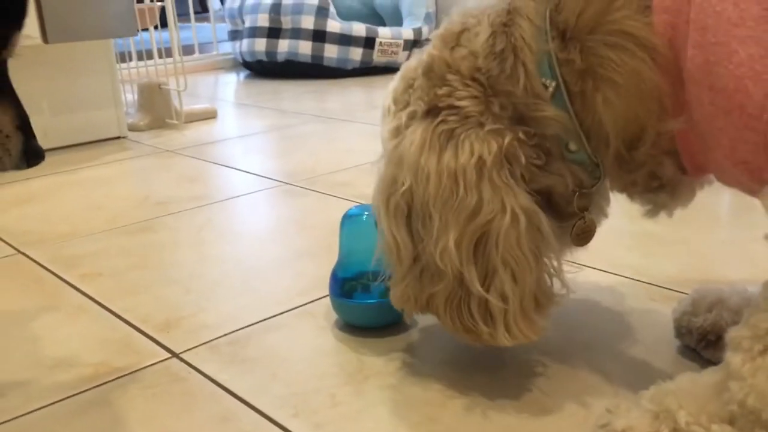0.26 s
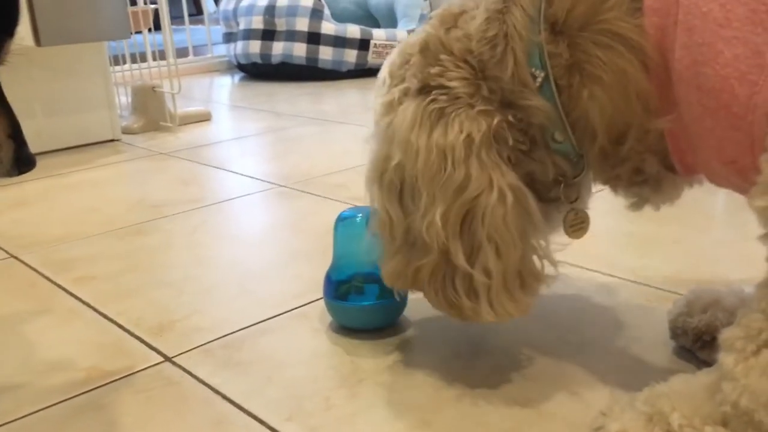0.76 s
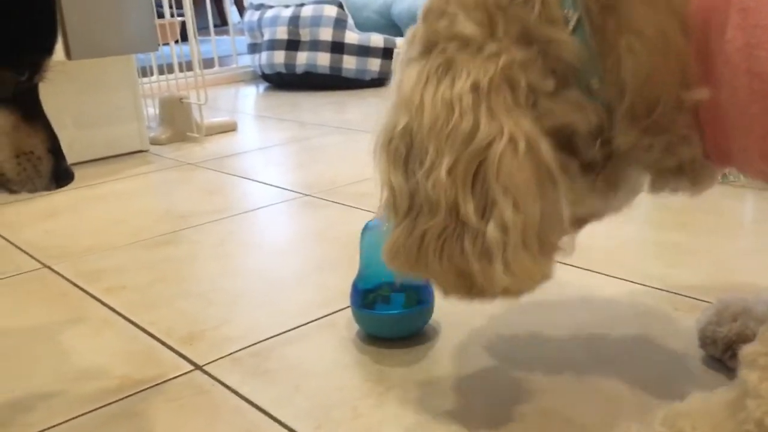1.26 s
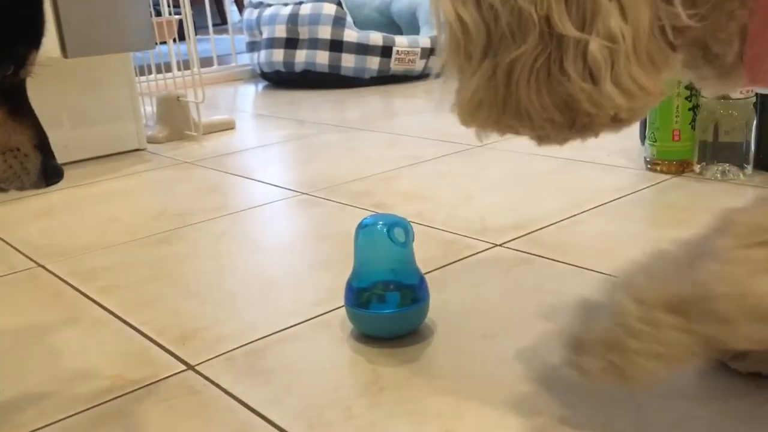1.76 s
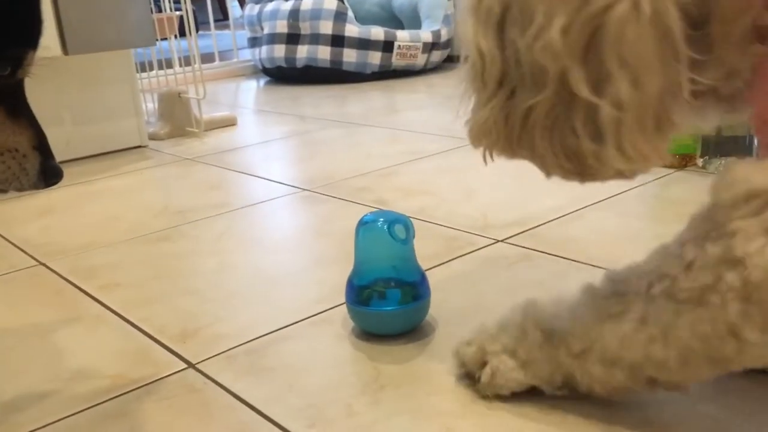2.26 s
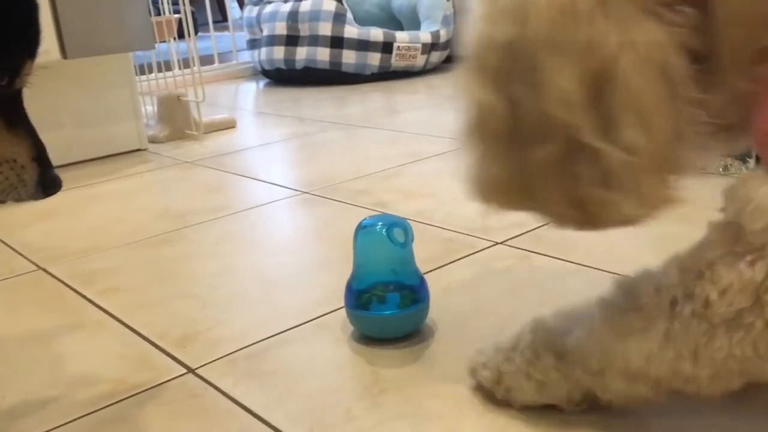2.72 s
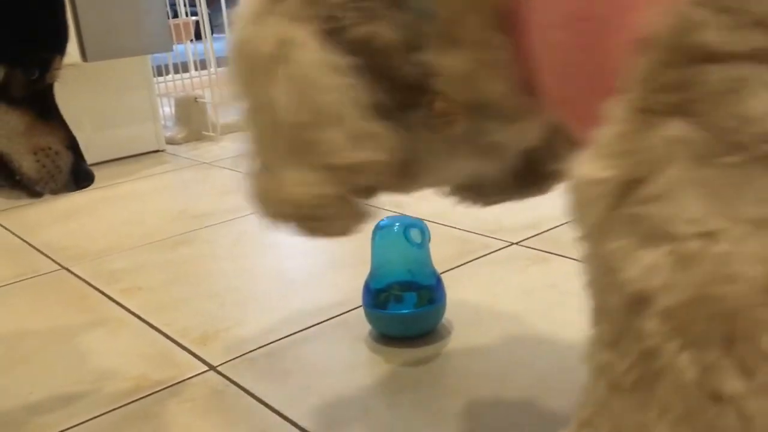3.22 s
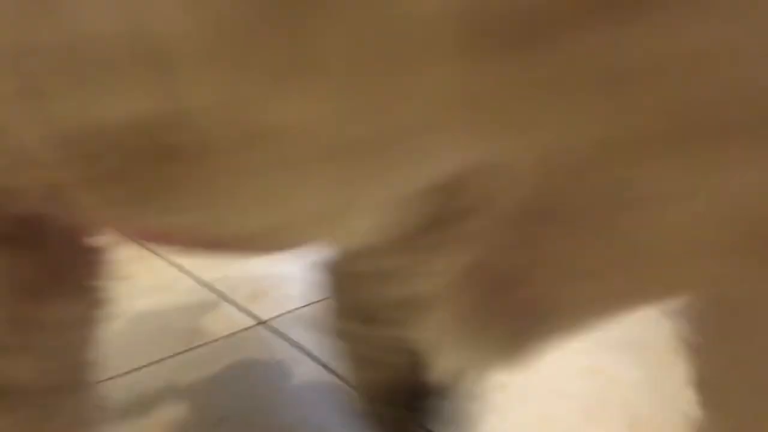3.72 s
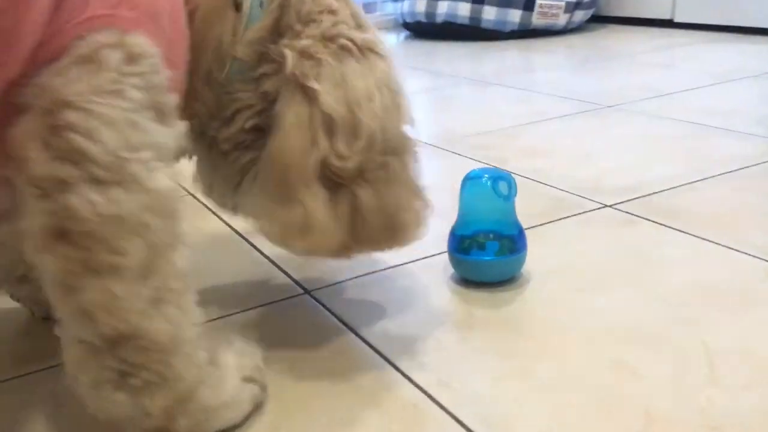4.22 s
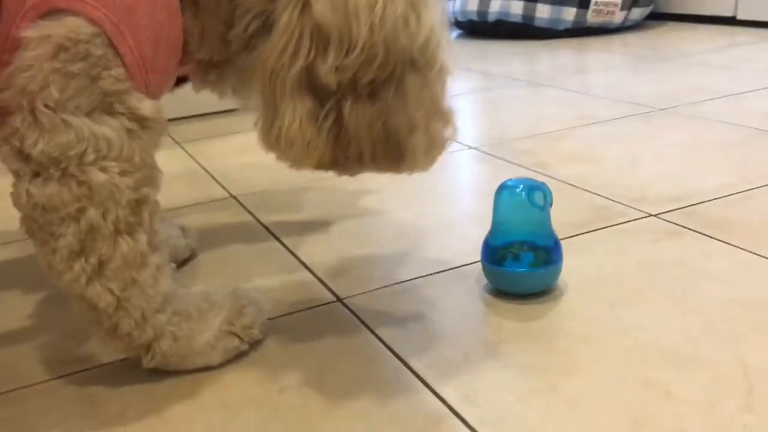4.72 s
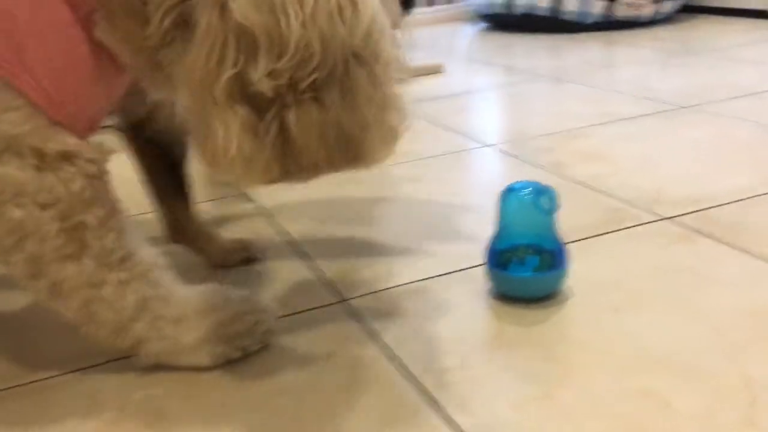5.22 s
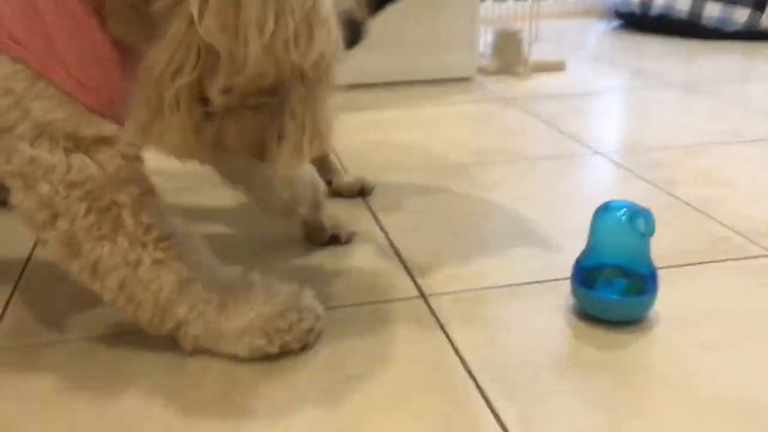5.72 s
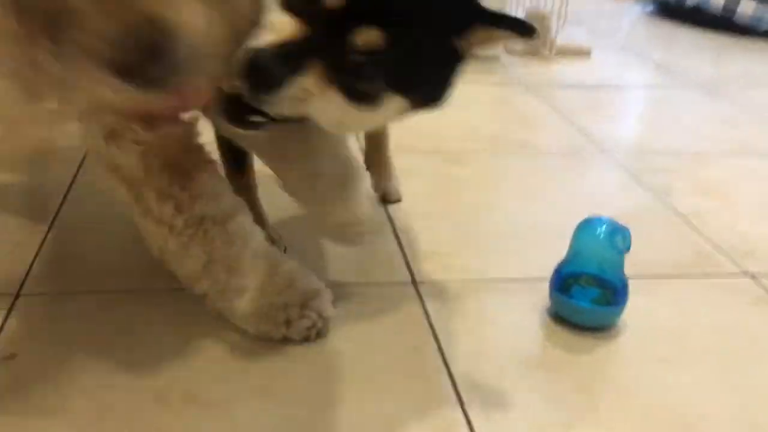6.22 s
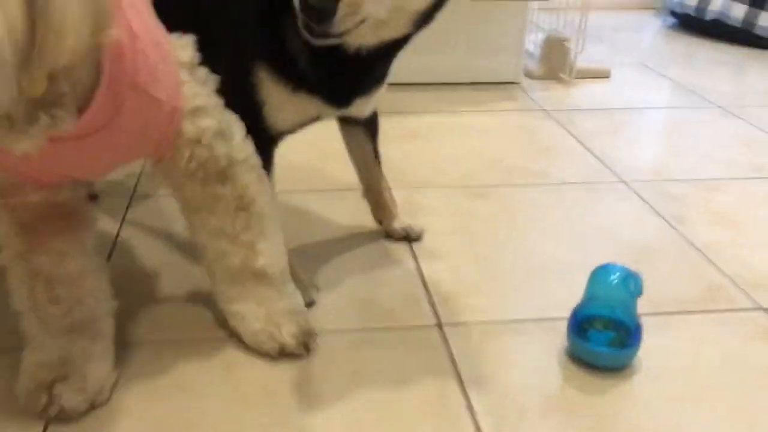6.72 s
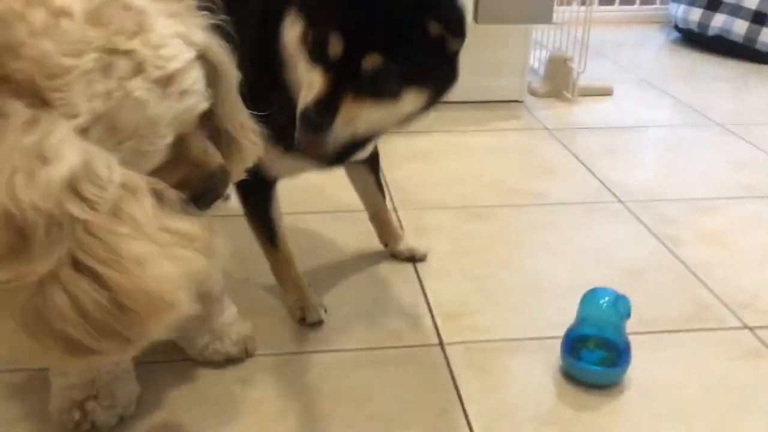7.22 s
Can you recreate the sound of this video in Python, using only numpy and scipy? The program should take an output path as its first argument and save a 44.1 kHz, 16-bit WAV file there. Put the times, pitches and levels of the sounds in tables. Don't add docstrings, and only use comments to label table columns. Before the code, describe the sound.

Dog claws click in quick clusters on hard tile around a hollow plastic toy, with fur scuffs, soft pad thuds and phone handling bumps.

```python
import sys
import numpy as np
from scipy import signal
from scipy.fft import rfft, irfft
from scipy.io import wavfile
from scipy.ndimage import uniform_filter1d

SR = 44100
rng = np.random.default_rng(int(sys.argv[2]) if len(sys.argv) > 2 else 0)


def inscribe(sig):
    pcm = np.round(np.clip(np.atleast_2d(sig).T, -1, 1) * 32767)
    wavfile.write(sys.argv[1], SR, pcm.astype(np.int16))


def decibels_to_gain(level_db):
    exponent = np.asarray(level_db, float) / 20
    return 10 ** exponent


N = 329532


def unit(x):
    return x / np.sqrt(np.mean(x ** 2))


def curve(table):
    rows = np.array(table)
    return np.interp(np.arange(N) / SR, rows[:, 0], rows[:, 1])


def response(points, size=N):
    hz, db = np.transpose(points)
    bins_hz = np.fft.rfftfreq(size, 1 / SR) + 1
    return decibels_to_gain(np.interp(np.log(bins_hz), np.log(hz), db))


def coloured(points):
    return unit(irfft(rfft(rng.standard_normal(N)) * response(points), N))


def band(x, hz, width_hz):
    return signal.lfilter(*signal.iirpeak(hz, hz / width_hz, SR), x)


def walk(rate_hz):
    hold = int(SR / rate_hz)
    steps = np.repeat(rng.standard_normal(N // hold + 1), hold)
    return unit(uniform_filter1d(uniform_filter1d(steps, hold), hold)[:N])


def add(out, s, sound):
    i = min(max(int(s * SR), 0), len(out))
    out[i:i + len(sound)] += sound[:len(out) - i]


# pitch_hz, level_db (per Hz)
AIR_COLOUR = [(60, -36), (120, -10.5), (160, 4), (210, -7.5), (320, -10.5), (500, -19), (1000, -20.5),
              (2000, -29.5), (4000, -28), (8000, -30), (16000, -24)]


def room_hiss(level_db=-60):
    return decibels_to_gain(level_db) * coloured(AIR_COLOUR)


def port_hiss(hz=4590, width_hz=130, level_db=-80.5):
    noise = rng.standard_normal(N)
    return decibels_to_gain(level_db) * unit(band(band(noise, hz, width_hz), hz, width_hz))


# start_s, end_s, pitch_hz, level_db
LENS_WHINES = [
    (2.04, 2.28, 12780, -76),
    (7.14, 7.38, 12800, -78),
]


def whine(fade_s=0.01):
    t = np.arange(N) / SR
    out = np.zeros(N)
    for start, end, hz, db in LENS_WHINES:
        fade = np.clip(np.minimum(t - start, end - t) / fade_s, 0, 1)
        out += decibels_to_gain(db) * fade * np.sin(2 * np.pi * hz * t)
    return out


FOCUS_BEATS = [2, 8, 11, 14, 20, 26, 32, 38, 44, 50, 104, 110, 116, 122, 128, 139, 146]
# peak_db, ring_hz, brightness_db
FOCUS_CLICKS = [
    (-45.5, 5200, -1.5),
    (-50.5, 4900, 5.5),
]
FOCUS_START_S, FOCUS_BEAT_S, FOCUS_GAP_S = 0.049, 0.05, 0.0048
STEADY_BEATS = [0, 3, 9, 12, 15, 18, 21, 40, 41, 47, 50, 51, 54, 57, 58, 62, 68, 70]
# peak_db, ring_hz, brightness_db
STEADY_CLICK = (-44.5, 5100, -3)
STEADY_START_S, STEADY_BEAT_S = 0.0058, 0.1024


def motors(ring_s=0.0002, crack_s=0.00019, crack_hz=8500, scatter_db=-1.5):
    clicks = [(FOCUS_START_S + beat * FOCUS_BEAT_S + k * FOCUS_GAP_S, *click)
              for beat in FOCUS_BEATS for k, click in enumerate(FOCUS_CLICKS)]
    clicks += [(STEADY_START_S + beat * STEADY_BEAT_S, *STEADY_CLICK) for beat in STEADY_BEATS]
    out, t = np.zeros(N), np.arange(-40, 40) / SR
    for (s, db, hz, bright_db), c in zip(clicks, rng.standard_normal(len(clicks))):
        ring = np.sin(2 * np.pi * hz * t) * np.exp(-(t / ring_s) ** 2)
        crack = decibels_to_gain(bright_db) * np.cos(2 * np.pi * crack_hz * t) * np.exp(-(t / crack_s) ** 2)
        add(out, s + t[0], decibels_to_gain(db + scatter_db * c) * (ring + crack))
    return out


# time_s, level_db
GRIP_LEVEL = [(0.0, -50), (0.25, -50.5), (0.77, -50.5), (1.04, -57), (1.27, -49.5), (1.77, -57),
              (2.18, -54.5), (2.7, -58), (3.64, -56.5), (3.99, -51), (5.22, -56), (5.43, -48), (5.82, -54),
              (6.12, -50.5), (6.24, -49), (6.62, -50), (6.99, -49.5), (7.47, -48.5)]
# pitch_hz, level_db (per Hz)
GRIP_COLOUR = [(12, -48), (25, -7), (42, 5.5), (65, 2.5), (110, -9.5), (200, -19), (400, -41.5),
               (900, -52.5)]


def grip():
    lumps_db = 2.5 * walk(33) + 0.6 * walk(6)
    return decibels_to_gain(curve(GRIP_LEVEL) + 3.0 + lumps_db) * coloured(GRIP_COLOUR)


# centre_s, peak_db, pitch_hz, direction (1 or -1)
WRIST_SWAYS = [(.034, -39.5, 49, 1), (.07, -43, 50, 1), (6.815, -37, 90, 1), (3.23, -42, 100, -1),
               (1.165, -44, 121, 1), (.174, -37.5, 80, -1), (.368, -35.5, 58, 1), (.457, -37.5, 67, -1),
               (.66, -41, 49, 1), (.7985, -31.5, 71.5, -1), (1.34, -39, 72, -1), (3.988, -42, 64, -1),
               (4.0997, -38, 71.5, -1), (5.116, -35, 62, -1), (5.528, -36, 48, -1), (5.612, -38, 58, 1),
               (6.142, -38, 93, 1), (6.241, -32, 51.7, -1), (6.3445, -37, 51, 1), (6.445, -41, 62, 1),
               (6.5516, -37.5, 58, 1), (6.595, -38.5, 50, 1), (6.7156, -37.5, 62, -1), (6.976, -35, 57, 1),
               (7.103, -37, 47.7, 1), (7.195, -38, 45, -1), (7.305, -38, 45, 1)]


def sways(cycles=0.86):
    out, t = np.zeros(N), np.arange(-3000, 3000) / SR
    for s, db, hz, direction in WRIST_SWAYS:
        swing = np.exp(-(t * hz / cycles) ** 2) * np.cos(2 * np.pi * hz * t)
        add(out, s + t[0], np.sign(direction) * decibels_to_gain(db) * swing)
    return out


# largest_swing_s, peak_db, pitch_hz
FINGER_PRESSES = [(0.162, -38.5, 76), (0.447, -37.5, 128), (0.7098, -31.5, 98), (1.0622, -24, 111),
                  (1.451, -31.5, 119), (1.507, -37, 227), (1.7323, -37, 80), (1.826, -33, 218),
                  (2.291, -24, 107), (4.1076, -32, 69), (4.1829, -29, 143), (4.2648, -32, 146),
                  (4.6565, -28.5, 110), (4.897, -24.5, 109), (4.9735, -25.5, 127), (5.1266, -31.5, 65.6),
                  (5.3767, -35, 98), (5.507, -37.5, 205), (6.0714, -39.5, 190), (6.7995, -30.5, 187),
                  (7.3632, -17, 83), (7.3924, -25.5, 158)]
# largest_swing_s, peak_db, pitch_hz
FINGER_RELEASES = [(1.7375, -36, 61), (0.7474, -40, 145), (0.7805, -34, 90), (1.222, -42.5, 170),
                   (1.2449, -39, 137), (3.8397, -36, 91), (4.734, -35, 100), (4.7555, -33, 68.6),
                   (4.75, -33.5, 124), (5.111, -34, 85), (4.9812, -26.5, 86.6), (5.2513, -30.5, 66),
                   (5.742, -31, 101), (5.8339, -42.5, 188), (6.0835, -35.5, 163), (6.0957, -33.5, 104),
                   (6.625, -30.5, 74), (7.0383, -29.5, 72.5), (7.0531, -36, 73.5)]
ROLL_LEAD_S, ROLL_DB = 0.0153, -26


def thumps(glide_s=0.0038, low_share=0.36, rise_s=0.0026, fade_s=0.015, slap_s=0.0016, slap_db=-12,
           abrupt=1.26, shorter=0.67):
    rolls = [(s - ROLL_LEAD_S, db + ROLL_DB, hz) for s, db, hz in FINGER_PRESSES]
    jolts = [(*row, 1) for row in FINGER_PRESSES]
    jolts += [(*row, -1) for row in list(FINGER_RELEASES) + rolls]
    out, t = np.zeros(N), np.arange(-441, 4000) / SR
    for s, db, hz, direction in jolts:
        glide = glide_s * (1 - np.exp(-t / glide_s))
        turns = 1.345 * hz * (low_share * t + (1 - low_share) * glide)
        rise = np.exp(-(t / rise_s) ** 2)
        fade = np.exp(-np.abs(t / fade_s * (hz / 130) ** shorter) ** abrupt)
        swings = np.where(t < 0, rise, fade) * np.cos(2 * np.pi * turns)
        lead = t + 0.435 / hz
        slap = -decibels_to_gain(slap_db) * np.exp(-(lead / slap_s) ** 2) * np.cos(2 * np.pi * 2.0 * hz * lead)
        add(out, s + t[0], np.sign(direction) * decibels_to_gain(db) * (swings + slap))
    return out


# centre_s, peak_db, pitch_hz
HOLLOW_KNOCKS = [(.680, -45, 1000), (.697, -52, 800), (4.295, -46.5, 800), (4.8914, -42, 240),
                 (7.3591, -31, 168), (7.241, -48, 1500), (7.462, -43.5, 1200), (1.343, -44.5, 720),
                 (1.358, -50, 700), (1.47, -48, 294), (1.474, -56, 650), (1.727, -45.5, 400),
                 (1.811, -39.5, 200), (1.775, -44, 150), (3.906, -42.5, 600), (3.909, -34, 1300),
                 (4.539, -43, 1010), (4.719, -52, 1500), (4.749, -48, 650), (4.969, -43, 590),
                 (4.981, -42.5, 700), (5.029, -49, 603), (5.125, -50, 650), (7.391, -46, 900)]


def knocks(cycles=0.74):
    out, t = np.zeros(N), np.arange(-200, 200) / SR
    for s, db, hz in HOLLOW_KNOCKS:
        add(out, s + t[0], decibels_to_gain(db) * np.exp(-(t * hz / cycles) ** 2) * np.cos(2 * np.pi * hz * t))
    return out


# start_s, level_db, floor_ring_hz
PAD_THUDS = [(2.001, -68, 292), (2.706, -45.5, 296), (3.2, -51.5, 282), (3.401, -42.5, 194),
             (3.717, -52, 297), (3.905, -42, 129), (4.379, -42.5, 142), (4.526, -47.5, 280),
             (5.211, -44, 240), (4.86, -50, 273), (5.601, -52, 235), (6.043, -43.5, 194),
             (6.647, -42.5, 298), (6.645, -46, 504), (7.238, -57.5, 480), (6.36, -55, 350)]


def pads(rise_s=0.0012, fade_s=0.025, width=0.56):
    out, t = np.zeros(N), np.arange(6000) / SR
    swell = (1 - np.exp(-(t / rise_s) ** 2)) * np.exp(-t / fade_s)
    for (s, db, hz), c in zip(PAD_THUDS, rng.standard_normal((len(PAD_THUDS), len(t)))):
        floor = unit(band(band(c, hz, width * hz), hz, width * hz))
        add(out, s, decibels_to_gain(db) * swell * floor)
    return out


# start_s, end_s, level_db, rasp_hz
NAIL_DRAGS = [(.44, 0.515, -67.5, 3300), (1.108, 1.356, -64.5, 3780), (1.55, 1.617, -66, 3720),
              (2.053, 2.153, -69, 3580), (2.159, 2.185, -57, 3140), (2.528, 2.573, -64.5, 4000),
              (2.815, 2.864, -51.5, 3340), (3.07, 3.213, -53, 3380), (3.259, 3.272, -49, 2860),
              (3.282, 3.349, -59.5, 2720), (3.46, 3.469, -37.5, 4000), (3.556, 3.573, -45, 4270),
              (3.566, 3.578, -42, 3600), (4.332, 4.4, -54.5, 3180), (4.339, 4.363, -46.5, 3950),
              (4.366, 4.379, -53, 3540), (7.0, 7.15, -64.5, 3580), (4.425, 4.46, -49, 7000),
              (4.433, 4.461, -46, 4400), (3.558, 3.573, -55, 7200), (4.387, 4.442, -56.5, 3900),
              (4.426, 4.47, -53, 3650), (4.46, 4.506, -60, 4000), (4.696, 4.728, -55, 4460),
              (4.903, 4.95, -56, 4100), (6.232, 6.333, -59.5, 3830), (7.418, 7.516, -59, 3400)]
# start_s, end_s, level_db, brightness_db
FUR_SWEEPS = [(1.276, 1.393, -67, 3), (1.4, 1.556, -71, 14), (1.657, 1.731, -63.5, -4),
              (2.402, 2.534, -61, -1), (3.474, 3.512, -60.5, 11), (3.475, 3.54, -58.5, 1),
              (3.663, 3.79, -58.5, 12), (3.748, 4.004, -46, 1.5), (4.015, 4.11, -53, 4.5),
              (4.234, 4.298, -52.5, 8), (4.46, 4.712, -57, 0.5), (4.7, 4.853, -62, 1.5),
              (4.841, 4.89, -60, 8.5), (5.002, 5.063, -62.5, 8.5), (5.038, 5.29, -61, 6.5),
              (5.267, 5.381, -59.5, 5), (5.337, 5.597, -61, 2.5), (5.57, 5.674, -58, 12),
              (5.665, 5.773, -66, 8.5), (5.772, 6.033, -67, 6), (5.913, 6.402, -60, 2),
              (6.527, 6.646, -58.5, 13.5), (6.692, 6.798, -58.5, 7.5), (6.801, 6.917, -56, 5)]
# start_s, end_s, level_db, rasp_hz
TOY_RUBS = [(0.6, 0.72, -67, 840), (3.675, 4.092, -60, 296), (4.485, 5.86, -69.5, 418),
            (4.868, 4.967, -61.5, 2370), (5.117, 5.266, -63, 2340), (5.136, 5.252, -63, 2900),
            (6.362, 6.41, -67, 2484), (6.948, 7.213, -63.5, 920), (6.97, 7.22, -62.5, 2280),
            (7.385, 7.52, -64, 820), (1.15, 1.3, -70, 1820), (2.296, 3.557, -78, 290),
            (5.748, 6.996, -74.5, 414), (6.067, 6.075, -59, 700), (5.842, 6.35, -71, 2030)]
# start_s, end_s, level_db, rasp_hz
WET_SQUEAKS = [(4.921, 4.927, -42.5, 3730), (4.986, 5.0, -55.5, 3100), (4.985, 4.996, -55, 4350),
               (4.93, 4.985, -63, 3500), (4.43, 4.463, -49, 4480), (7.258, 7.272, -57, 4030),
               (1.158, 1.27, -64.5, 514), (5.586, 5.655, -57.5, 3900), (3.561, 3.578, -47.5, 4220),
               (5.127, 5.134, -54.5, 3500), (5.165, 5.222, -59, 3500), (6.361, 6.424, -60, 2200),
               (7.25, 7.285, -60, 1340), (1.42, 1.513, -69, 3900), (6.148, 6.17, -55.5, 4040)]
# rasp_width (share of its pitch), body_db, squeak_db
RUB_TONE = (.55, -13, -5)
SQUEAK_TONE = (0.082, -19.5, -4)


def scuffs(grain_db=2.0, edge=0.68, dull_db=-38):
    # start_s, end_s, level_db, brightness_db, rasp_hz, then the three of a tone
    strokes = [(a, b, db, -9, hz, 0.78, -39, -6) for a, b, db, hz in NAIL_DRAGS]
    strokes += [(*row, 3470, 1, -8.5, -19) for row in FUR_SWEEPS]
    strokes += [(a, b, db, dull_db, hz, *RUB_TONE) for a, b, db, hz in TOY_RUBS]
    strokes += [(a, b, db, dull_db, hz, *SQUEAK_TONE) for a, b, db, hz in WET_SQUEAKS]
    out = np.zeros(N)
    grit = rng.standard_normal((3, N)) * decibels_to_gain(grain_db * walk(300))
    hiss, body = unit(band(grit[0], 15300, 13200)), unit(band(grit[1], 830, 890))
    slips = rng.standard_normal(N) * decibels_to_gain(6 * walk(90))
    for a, b, db, bright_db, hz, width, body_db, squeak_db in strokes:
        span = slice(int(a * SR), min(int(b * SR), N))
        u = (np.arange(span.start, span.stop) / SR - a) / (b - a)
        swell = np.sin(np.pi / 2 * np.clip(np.minimum(u, 1 - u) / edge, 0, 1)) ** 0.74
        rasp = unit(band(band(grit[2, span], hz, width * hz), hz, 2 * width * hz))
        overtone = 0.5 * band(slips[span], 1.64 * hz, hz / 5)
        squeak = unit(band(slips[span], hz, hz / 10) + overtone)
        stroke = rasp + decibels_to_gain(squeak_db) * squeak + decibels_to_gain(bright_db) * hiss[span] + decibels_to_gain(body_db) * body[span]
        out[span] += decibels_to_gain(db) * swell * stroke
    return out


# pitch_hz, width_hz, early_db, early_t60_s, late_db, late_t60_s
ROOM_BANDS = [(700, 1390, -34, 0.19, -42, 0.42), (1970, 2570, -12, 0.0098, -44, 0.38),
              (4000, 640, -10.5, 0.0063, -52, 0.3), (7700, 6200, -16.5, 0.012, -36, 0.28),
              (13100, 3400, -60, 0.0095, -37.5, 0.3)]


def room(x, count=12, step_s=0.2):
    t = np.arange(int(SR / 2)) / SR
    lumps = decibels_to_gain(walk(500)[:count * len(t)].reshape(count, -1))
    echoes = rng.standard_normal((count, len(t))) * lumps
    build = 1 - np.exp(-(t / 0.003) ** 2)
    tail = 0
    for hz, width_hz, early_db, early_t60, late_db, late_t60 in ROOM_BANDS:
        shape = decibels_to_gain(early_db - 60 * t / early_t60) + decibels_to_gain(late_db - 60 * t / late_t60)
        tail = tail + shape * band(echoes, hz, width_hz)
    step = int(step_s * SR)
    padded, fade = np.pad(x, (step, 2 * step)), np.sqrt(np.hanning(2 * step))
    wet = np.zeros(len(padded))
    for k in range(N // step + 2):
        piece = padded[k * step:(k + 2) * step] * fade
        add(wet, (k * step + 0.5) / SR, signal.fftconvolve(piece, build * tail[k % count]))
    return wet[step:step + N]


# start_s, peak_db, ring_hz, brightness_db
FIRST_CLAWS = [(1.9619, -20.5, 3100, -2), (2.2883, -20.5, 3380, -17), (2.6999, -18.5, 3780, -7.5),
               (3.0503, -16.5, 3750, -5.5), (3.122, -35, 3920, -12), (3.1235, -34, 3000, -17),
               (3.1862, -20, 4000, -7), (3.401, -15.5, 4040, -1), (3.4654, -34, 3900, 1),
               (3.6581, -14, 4000, -4), (3.8036, -19.5, 4180, -0.5), (3.9002, -22, 3300, -6),
               (3.9336, -20.5, 5070, -3), (3.9468, -27.5, 3200, -19), (3.9705, -21, 4190, -5),
               (4.2571, -26, 3700, -18), (4.3346, -34, 3660, -11), (4.5222, -31, 4060, -2),
               (4.5932, -35, 6600, -3), (6.0422, -31, 3470, -8), (6.3635, -26, 4020, -14.5),
               (6.3643, -30.5, 3600, -15), (6.642, -11.5, 4660, -12), (6.8268, -32, 7200, -4),
               (7.241, -28.5, 3920, -8), (7.4707, -37, 3260, -9)]
# start_s, peak_db, ring_hz, brightness_db
OTHER_TOES = [(1.9638, -17, 3620, -7.5), (1.9671, -20, 4000, -9), (1.9698, -38, 3770, -6),
              (1.9781, -27.5, 3940, -7), (2.2908, -17.5, 3800, -9.5), (2.2967, -18.5, 4460, -12),
              (2.3049, -21.5, 3700, -2.5), (2.701, -25.5, 4000, -15), (2.7032, -21.5, 3260, -2),
              (3.0461, -38, 3430, -2), (3.0513, -21, 3940, -4), (3.0616, -21, 3530, -2.5),
              (3.1823, -29, 4400, -5), (3.1849, -30, 4000, -9), (3.4059, -22.5, 2840, -11),
              (3.4234, -28, 5100, -1), (3.6596, -13.5, 3740, -6), (3.6655, -16.5, 3640, -8),
              (3.9043, -22.5, 4670, -4), (3.9054, -29.5, 4000, -8), (3.9749, -21, 4130, 9),
              (3.9723, -26, 4200, -1), (4.2635, -28, 3820, -7), (4.5198, -31, 4130, -5),
              (4.5376, -25.5, 4000, -6), (6.6428, -11, 4190, -4), (6.6469, -12.5, 7140, -2),
              (6.6469, -15.5, 3900, -16), (6.6506, -23, 3930, -10), (7.2369, -40, 3000, -20),
              (7.2394, -33, 4000, -9), (7.2498, -20.5, 3970, -6)]
# start_s, peak_db, ring_hz
LIGHT_TOUCHES = [(0.4248, -46.5, 5500), (0.47, -44.5, 2800), (0.5506, -52, 3340), (1.487, -47, 3930),
                 (1.2984, -45, 4260), (1.3095, -49, 4100), (1.3428, -37, 4000), (1.4607, -59, 3800),
                 (1.4769, -44, 3950), (1.586, -43.5, 3730), (1.702, -42, 2980), (1.878, -48.5, 5540),
                 (1.884, -73, 4070), (2.0798, -45.5, 3020), (2.431, -44, 5100), (2.7703, -42, 4200),
                 (3.0318, -44, 4480), (3.2652, -37, 2600), (3.2521, -51, 3000), (3.2948, -39, 4220),
                 (3.3852, -42, 4770), (3.5331, -41, 4200), (3.682, -29, 3240), (4.0787, -40, 2440),
                 (4.111, -43, 8300), (4.7138, -38, 4400), (5.1655, -41.5, 3150), (5.7083, -40, 4600),
                 (5.689, -49, 3800), (5.719, -48, 5500), (1.574, -54, 3000), (6.2311, -38, 3170),
                 (6.3304, -37.5, 5500), (6.3333, -44, 4300), (6.4418, -48, 5000), (6.8468, -46, 4200),
                 (6.2512, -46, 4000)]
# start_s, peak_db, ring_hz
TOY_RATTLES = [(.137, -49, 5000), (.4585, -53, 3780), (.494, -56, 3300), (.616, -54, 3600),
               (1.331, -54, 4200), (1.3545, -42, 4020), (1.370, -51, 4000), (1.4285, -51, 5000),
               (1.441, -51, 3600), (1.981, -42, 3800), (2.7148, -33, 4500), (2.721, -45, 2600),
               (2.730, -49, 3800), (2.738, -45, 3100), (3.779, -39, 3520), (3.846, -40, 4100),
               (4.2579, -26, 2550), (3.911, -40, 2000), (4.049, -36, 3830), (4.439, -43, 4730),
               (4.450, -31.5, 3800), (5.150, -54, 2750), (3.0672, -31, 4100), (3.557, -54, 2200),
               (7.051, -53, 4460), (7.392, -46.5, 4000), (7.446, -48, 5500), (6.6542, -31, 3300),
               (6.6605, -29, 4230)]
# start_s, knock_db (re the tick), knock_hz
PAW_WEIGHTS = [(0, -18, 1600), (1.95, -46, 2260), (2.28, -23, 1960), (2.69, -21, 1600), (3.04, -18.5, 1530),
               (3.17, -16, 1530), (3.39, -18.5, 1210), (3.65, -14.5, 1370), (3.79, -17.5, 1530),
               (3.89, -13, 1580), (3.96, -21, 1170), (4.25, -19, 1380), (4.51, -12.5, 1480),
               (6.35, -14.5, 1640), (6.63, -21, 1280), (7.23, -17.5, 1500)]
TOUCH_BRIGHT_DB, TOUCH_DB_PER_OCTAVE = -7, 7
MIRROR_S, MIRROR_SPREAD, MIRROR_DB = 0.0007, 0.2, -12


def claws(contact_s=0.00019, ring_s=0.00075, crack_s=0.00026, knock_s=0.0011, spread=0.45):
    ticks = list(FIRST_CLAWS) + list(OTHER_TOES)
    for s, db, hz in list(LIGHT_TOUCHES) + list(TOY_RATTLES):
        ticks.append((s, db, hz, TOUCH_BRIGHT_DB + TOUCH_DB_PER_OCTAVE * np.log2(hz / 4000)))
    out, t = np.zeros((2, N)), np.arange(400) / SR
    paws = np.array(PAW_WEIGHTS)
    chance = rng.standard_normal((len(ticks), 403))

    def tone(hz, phase=0):
        return np.sin(2 * np.pi * hz * t + phase)

    def fade(s):
        return np.exp(-(t / s) ** 2)

    rise = 1 - fade(contact_s)
    for (s, db, hz, bright_db), c in zip(ticks, chance):
        _, knock_db, knock_hz = paws[max(np.searchsorted(paws[:, 0], s) - 1, 0)]
        ring = tone(hz) + decibels_to_gain(-5) * tone(hz * (0.702 + c[0] / 30), c[1])
        ring += decibels_to_gain(bright_db - 0.5) * tone(min(1.72 * hz, 12000), c[0])
        crack = decibels_to_gain(bright_db + 7.0) * tone(10220, c[1]) * fade(crack_s)
        crack += decibels_to_gain(bright_db / 2 - 7.5) * tone(14800) * fade(1.7 * crack_s)
        grit = decibels_to_gain(bright_db - 0.5) * unit(band(c[2:402], 8500, 8500)) * np.exp(-t / 0.001)
        knock = decibels_to_gain(knock_db + 2.5) * tone(knock_hz) * np.exp(-t / knock_s)
        near = rise * (ring * fade(ring_s) + crack + grit + knock)
        side = rise * (ring * fade(ring_s * spread) / spread + decibels_to_gain(1.5) * crack + knock)
        gain = decibels_to_gain(db + 3.0) / np.abs(near).max()
        start = s - 0.0003
        mirror_delay = MIRROR_S * np.exp(MIRROR_SPREAD * c[-1])
        add(out[0], start, gain * near)
        add(out[0], start + mirror_delay, gain * decibels_to_gain(MIRROR_DB) * near)
        add(out[1], start, gain * side)
    return out


# pitch_hz, gain_db
MIC_COLOUR = [(300, 0), (1000, -2.5), (2000, -2), (3000, 0), (4300, 1.5), (5200, -2), (7500, -1.5),
              (9400, -3), (10400, -9), (11500, -6), (16000, -6)]


def scene():
    ticks, sideways = claws()
    rubbing = scuffs()
    air = ticks + motors() + rubbing + room(sideways + rubbing) + room_hiss()
    heard = irfft(rfft(air) * response(MIC_COLOUR), N)
    handling = thumps() + sways() + grip()
    return (heard + whine() + handling + port_hiss() + pads() + knocks())[None]


def top_cut(x):
    return signal.sosfilt(signal.butter(12, 16820, fs=SR, output="sos"), x)


def record(dry):
    low_pass = signal.ellip(6, 0.3, 30, 15900, fs=SR, output="sos")
    cut = signal.sosfilt(low_pass, dry)
    return top_cut(cut)


dry = scene()
out = record(dry)
inscribe(out)
```